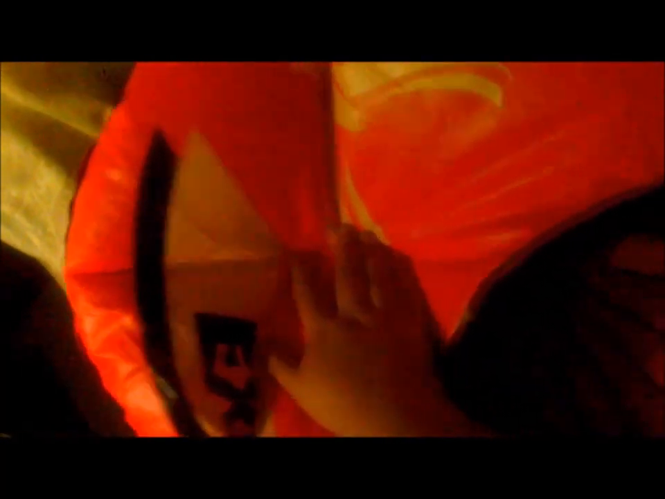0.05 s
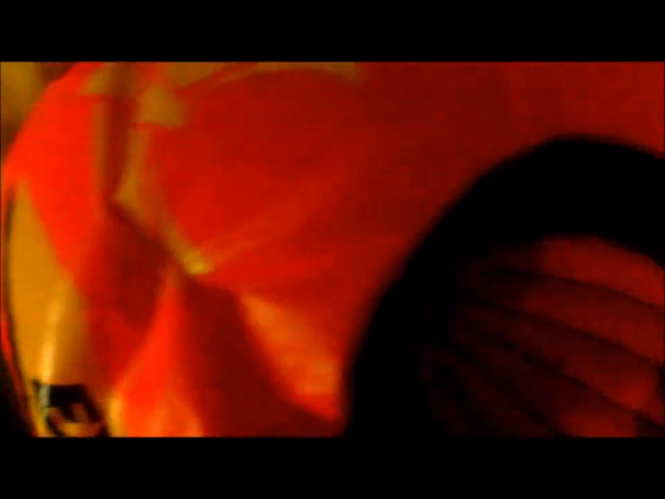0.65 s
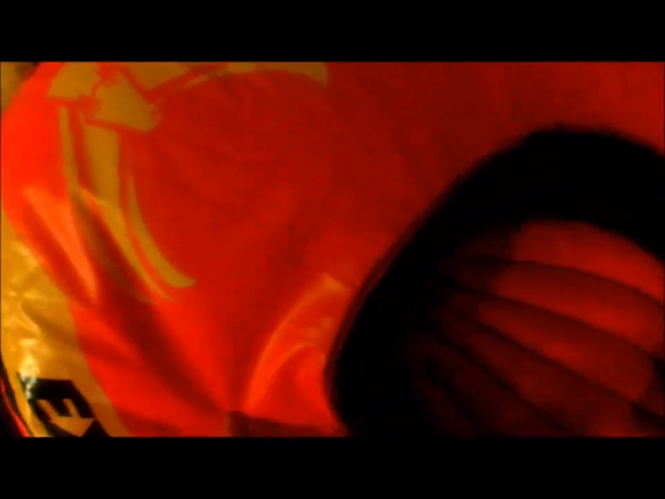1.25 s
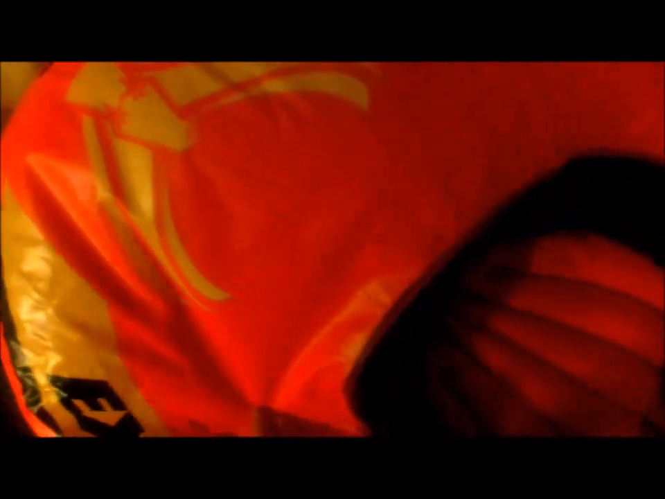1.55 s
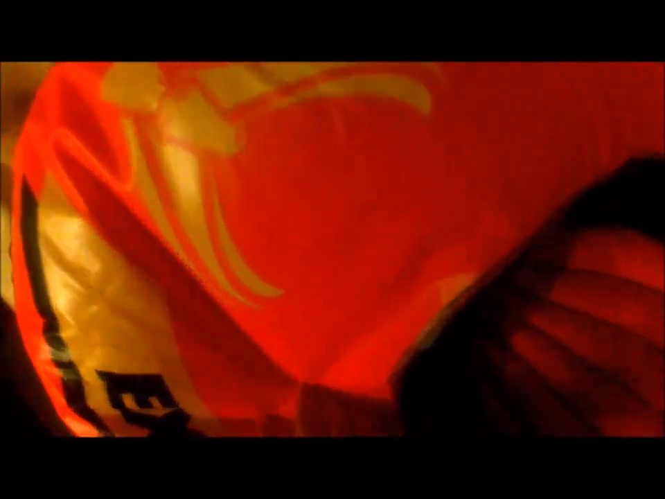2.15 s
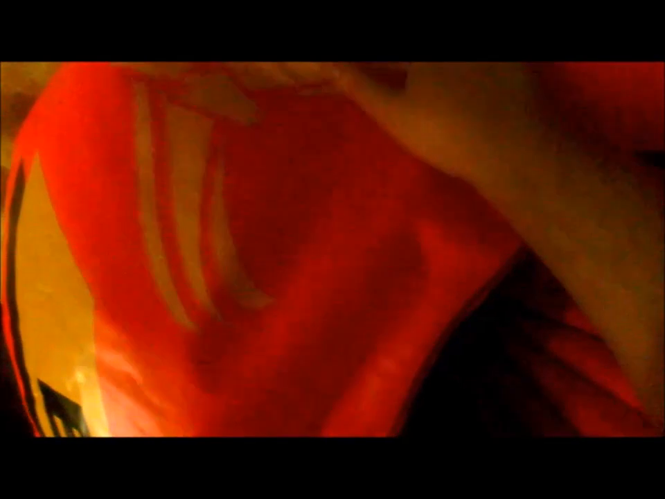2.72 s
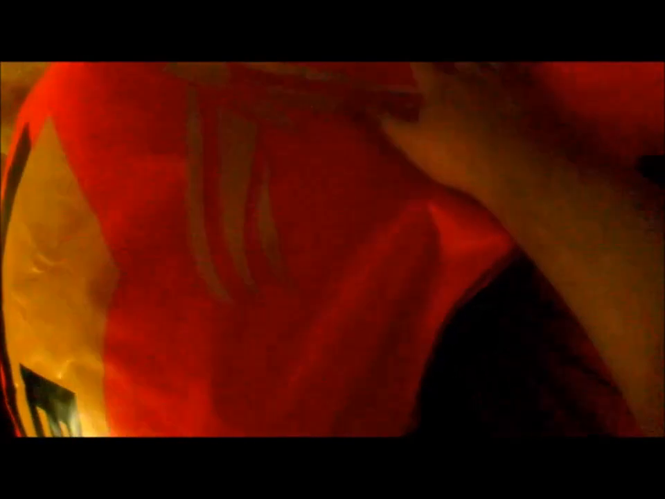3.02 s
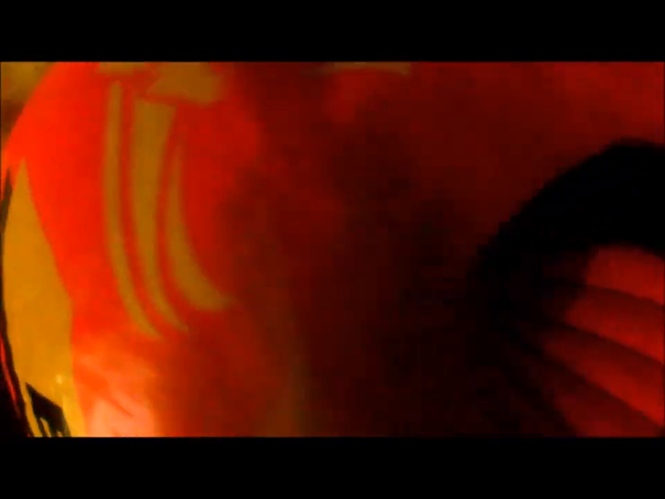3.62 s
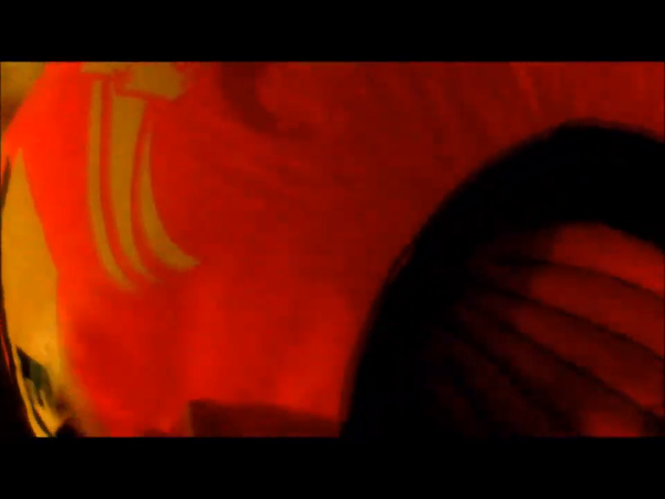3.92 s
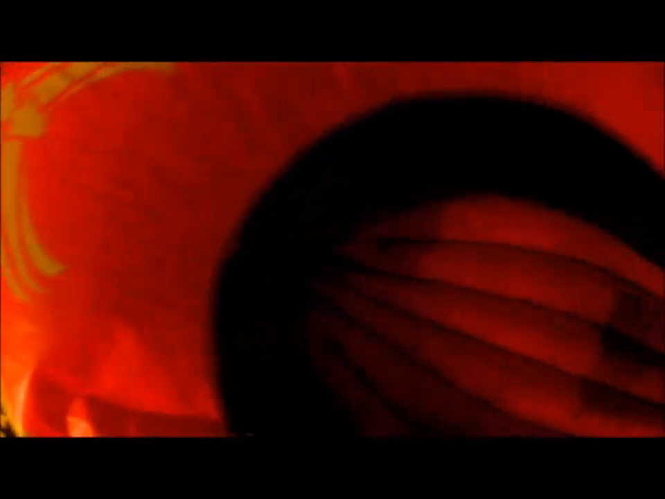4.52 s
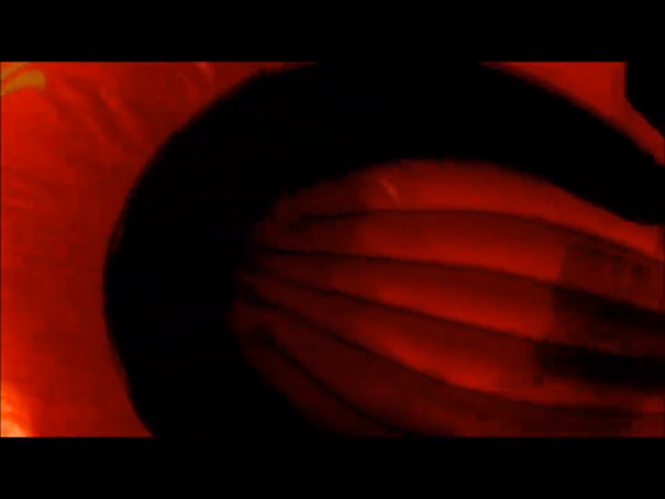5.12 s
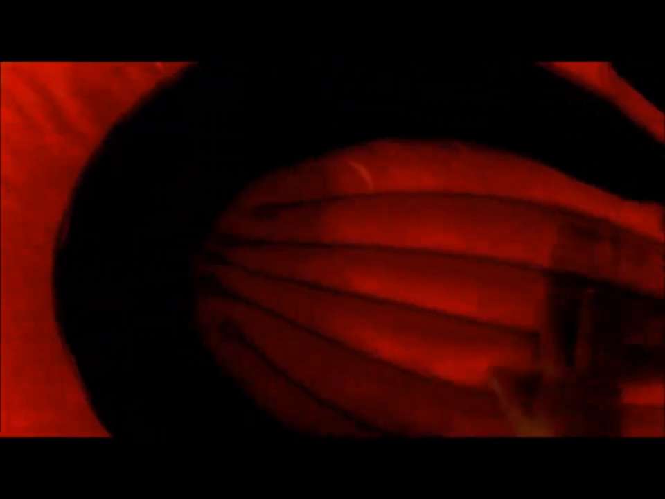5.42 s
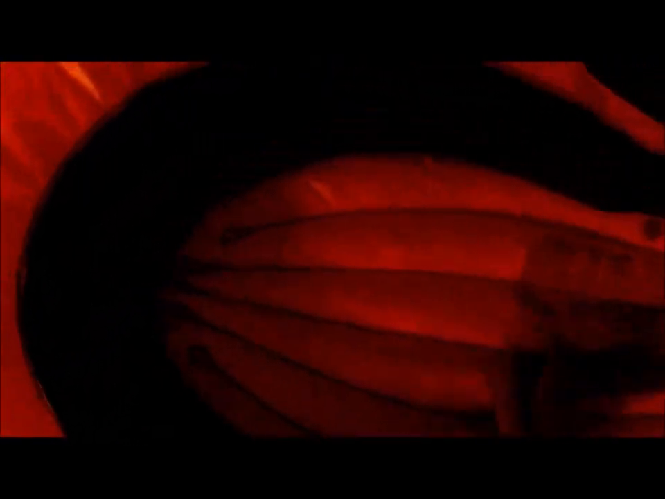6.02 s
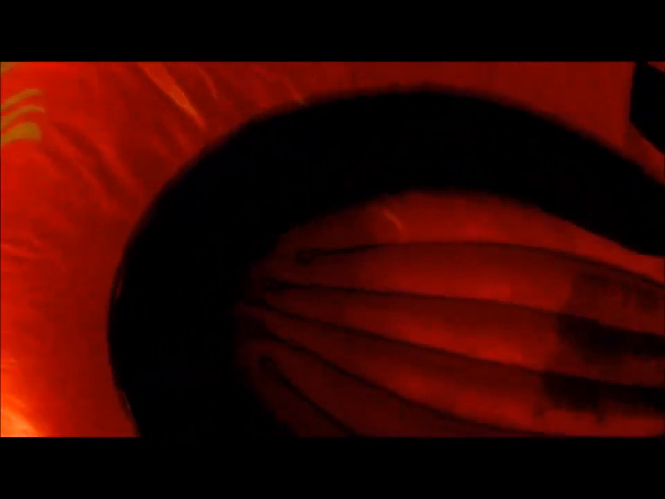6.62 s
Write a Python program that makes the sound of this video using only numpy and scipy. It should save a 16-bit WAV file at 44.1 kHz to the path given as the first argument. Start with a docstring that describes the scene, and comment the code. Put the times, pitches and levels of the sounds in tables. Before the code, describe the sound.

Hands squeeze an inflatable vinyl boat close to the microphone in a small, quiet room. At about 0.3 seconds, fingers judder over the vinyl and creases snap loudly, followed by dull pops from the tube. Soft palm scuffs, rustling folds and small pops continue over a faint hiss. Around 2.5 seconds the vinyl crackles, and the valve gives two bright spurts of hissing air before 3 seconds. Shorter, softer hisses come near 3.8 seconds and between 4.1 and 5.2 seconds, among more rubbing and buckling, with a very faint, thin whistling leak from about 4.2 to 5.5 seconds. Near 5.7 seconds the tube thumps, creases snap and wrinkles crackle with a puff of air. The loudest hisses follow at about 6.3 and 6.6 seconds as the palms scuff and push again.

```python
"""Deflating a vinyl boat

A small furnished room, one microphone close to the boat. Each push of the hands drives a bright,
turbulent hiss from the valve, and late on a thin leak sings faintly there. Palms scuff over the vinyl,
fingers judder and slack folds rustle. The air-filled tube rumbles and buckles with dull pops,
taut creases snap, and small wrinkles crackle."""
import sys
import numpy as np
from scipy import signal
from scipy.fft import rfft, irfft
from scipy.io import wavfile
from scipy.ndimage import map_coordinates

SR = 44100
rng = np.random.default_rng(int(sys.argv[2]) if len(sys.argv) > 2 else 0)


def output_pcm(signal):
    """Save a mono or channel-first signal as 16-bit PCM at the path in sys.argv[1].

    Samples are clipped to [-1, 1] before scaling.
    """
    pcm = np.clip(np.atleast_2d(signal).T, -1, 1) * 32767
    wavfile.write(sys.argv[1], SR, np.round(pcm).astype(np.int16))


N = 298116
TIME = np.arange(N) / SR
HAND_TIME = TIME[::32]  # hands move slowly, so a coarse clock is enough for them


def gain_of(db):
    """Decibels to amplitude."""
    return 10 ** (np.asarray(db) / 20)


def unit_rms(x):
    """Scales to rms 1."""
    return x / np.sqrt(np.mean(x ** 2) + 1e-20)


def coloured(x, spectrum):
    """Filters x by a spectrum with rows of frequency_hz, level_db."""
    hz, db = np.transpose(spectrum)
    bins_hz = np.fft.rfftfreq(len(x), 1 / SR)
    response = gain_of(np.interp(np.log(bins_hz + 1), np.log(hz), db))
    return irfft(rfft(x) * response, len(x))


def wander(rate_hz):
    """A smooth random curve of rms 1, moving mostly slower than rate_hz."""
    relative_rate = np.fft.rfftfreq(N, 1 / SR)[:N // 8] / rate_hz
    real, imaginary = rng.standard_normal((2, len(relative_rate)))
    return unit_rms(irfft((real + 1j * imaginary) / (1 + relative_rate ** 4), N))


def slips(per_s, spread_db):
    """Tiny random stick-slip clicks; spread_db sets how unequal they are."""
    size = gain_of(spread_db * np.minimum(rng.exponential(1, N), 4))
    sign = rng.choice([-1, 1], N)
    return unit_rms(size * sign * (rng.random(N) < per_s / SR))


def add(mix, start_s, sound):
    """Mixes a sound in at start_s."""
    part = mix[round(start_s * SR):][:len(sound)]
    part += sound[:len(part)]


def per_sample(*controls):
    """Spreads hand controls from the coarse clock over every sample."""
    return [np.interp(TIME, HAND_TIME, control) for control in controls]


def stroke(peak_s, rise_s, fall_s, roundness, drop_db=10):
    """Power of one hand movement, drop_db down one rise before and one fall after its peak."""
    away = np.maximum((peak_s - HAND_TIME) / rise_s, (HAND_TIME - peak_s) / fall_s)
    return gain_of(-drop_db * np.minimum(away, 10) ** roundness) ** 2  # roundness 1: pointed, 2: a bell


# The quiet room at the microphone: frequency_hz, level_db
ROOM_TONE_SPECTRUM = [(20, 1), (55, 8), (120, -9), (300, -19), (700, -2), (1300, -7), (3000, -13),
                      (7500, -6.5), (10000, -1), (14000, -10.5)]
def room_tone(level_db=-60):
    """Steady room rumble and microphone hiss."""
    return gain_of(level_db) * unit_rms(coloured(rng.standard_normal(N), ROOM_TONE_SPECTRUM))


def room_reverb(x, t60_s=0.072, wet_db=-19):
    """The furnished room adds a faint short tail behind the close sound."""
    t = np.arange(SR // 3) / SR
    tail = rng.standard_normal(len(t)) * gain_of(-60 * t / t60_s) * (t > .004)
    return x + gain_of(wet_db) * signal.fftconvolve(x, tail / np.linalg.norm(tail))[:N]


def near_reflections(x, echo_db, span_s, sway_s, count=6, above_hz=3000):
    """Small nearby walls mirror the treble and comb it; the notches drift as the walls move."""
    out = x.copy()
    treble = signal.sosfilt(signal.butter(2, above_hz, "high", fs=SR, output="sos"), x)
    for nominal_s in np.geomspace(span_s / 5, span_s, count):
        delay_s = nominal_s * rng.uniform(.85, 1.15) + sway_s * wander(1)
        out += gain_of(echo_db) * map_coordinates(treble, [(TIME - delay_s) * SR], order=3)
    return unit_rms(out)


def resonate(x, hz, width_hz):
    """A resonance of gain 1 whose pitch follows the curve hz."""
    turn = np.exp(2j * np.pi * np.cumsum(hz) / SR)
    pole = np.exp(-np.pi * width_hz / SR)
    return 2 * (turn * signal.lfilter([1 - pole], [1, -pole], x / turn)).real


# A thin leak at the valve, faint even this close: time_s, level_db
LEAK_LEVELS = [(4.15, -72), (4.4, -62), (4.62, -68), (4.84, -61), (4.93, -69), (5.03, -68), (5.14, -54),
               (5.25, -71), (5.38, -70), (5.45, -62), (5.58, -80)]
def leak(low_hz=4350, low_width_hz=520, high_hz=5850, high_width_hz=1800, drift=0.0086):
    """Slow air excites a narrow, slightly drifting resonance of the valve and a broader one above it."""
    sway = np.exp(drift * wander(7))
    air = rng.standard_normal(N)
    whistle = np.zeros(N)
    for hz, width_hz in [(low_hz, low_width_hz), (high_hz, high_width_hz)]:
        band = resonate(air, hz * sway, width_hz)
        whistle += unit_rms(resonate(band, hz * sway, width_hz))  # a second pass narrows the band
    level_db = np.interp(TIME, *np.transpose(LEAK_LEVELS), left=-np.inf, right=-np.inf)
    return gain_of(level_db) * whistle


# Small creases under the palm: frequency_hz, level_db
CRINKLE_SPECTRUM = [(200, -8), (500, -7.5), (900, 3.5), (1600, -6), (3000, 0), (7000, -18)]
def crinkles(scuff, gain_db=-10):
    """The sliding palm drags small creases over, each with a dry tick."""
    ticks = coloured(slips(per_s=260, spread_db=3), CRINKLE_SPECTRUM)
    return gain_of(gain_db) * scuff * unit_rms(ticks)


# The hollow, air-filled tube as it flexes: frequency_hz, level_db
RUMBLE_SPECTRUM = [(25, 5), (60, -1), (115, 8), (180, -4), (300, -10.5), (700, -22), (2000, -68)]
def tube_rumble(scuff, air, gain_db=-52, full_push_db=-52.5, vent_db=-32.5, lumpy_db=7):
    """The tube rumbles as it gives under the palm, less so once the air rushes out freely."""
    give = np.tanh(scuff / gain_of(full_push_db))
    venting = np.hypot(1, air / gain_of(vent_db))
    rumble = coloured(rng.standard_normal(N), RUMBLE_SPECTRUM) * gain_of(lumpy_db * wander(16))
    return gain_of(gain_db) * give / venting * unit_rms(rumble)


# Palms rubbing the boat, close up: frequency_hz, level_db
PALM_SPECTRUM = [(300, -10), (800, -5.5), (1400, 0.5), (2500, 2), (4300, 0.5), (6000, -4.5), (8000, -9),
                 (10000, -4.5), (14000, -31)]
def palms(scuff, gain_db=1.5, patchy_db=1):
    """Dense slips of skin on vinyl merge into a scuff."""
    rub = coloured(slips(per_s=5000, spread_db=2.5), PALM_SPECTRUM) * gain_of(patchy_db * wander(23))
    return gain_of(gain_db) * scuff * near_reflections(rub, echo_db=-3.5, span_s=.007, sway_s=.0004)


# Small wrinkles letting go: start_s, level_db, decay_s
WRINKLE_BURSTS = [(2.485, -34, .006), (2.4995, -32, 0.0026), (4.1, -39.5, 0.0086), (5.038, -38, 0.0044),
                  (5.564, -43, 0.0051), (5.6935, -26.5, 0.0017), (5.7004, -29, 0.0017),
                  (5.705, -30, 0.0034), (5.716, -31, 0.0064), (6.107, -35.5, 0.0044),
                  (6.192, -26.5, 0.0053)]
# Their colour, close up: frequency_hz, level_db
WRINKLE_SPECTRUM = [(200, 11.5), (1200, 5), (2800, 8), (5000, 5), (7500, 1), (11000, 3), (14000, 5)]
def crackles():
    """Each wrinkle lets go in a short bright burst of noise."""
    bursts, t = np.zeros(N), np.arange(SR // 8) / SR
    for start_s, level_db, decay_s in WRINKLE_BURSTS:
        add(bursts, start_s, gain_of(level_db) * np.exp(-t / decay_s))
    return bursts * unit_rms(coloured(rng.standard_normal(N), WRINKLE_SPECTRUM))


# Slack folds rolling over: peak_s, rise_s, fall_s, level_db
FOLD_ROLLS = [(0.04, .03, 0.15, -62), (0.28, 0.059, 0.048, -40.5), (0.36, 0.04, 0.045, -29.5),
              (0.534, 0.021, 0.038, -40.5), (0.63, 0.06, 0.091, -52), (1.233, 0.044, 0.14, -51),
              (1.57, .03, .03, -54), (1.76, 0.098, 0.066, -53.5), (2.22, 0.073, 0.12, -51),
              (2.439, 0.051, 0.045, -40), (2.84, 0.13, 0.4, -51.5), (3.04, 0.088, 0.083, -47),
              (3.14, 0.048, .1, -46), (3.651, .08, 0.09, -41), (3.88, 0.074, 0.053, -49.5),
              (4.151, .04, 0.037, -53), (4.265, 0.044, 0.018, -50.5), (4.48, .03, 0.091, -48.5),
              (4.6, .03, 0.052, -48), (5.06, 0.016, 0.15, -45), (5.14, .05, 0.055, -44.5),
              (5.762, 0.047, .045, -32.5), (5.89, 0.043, 0.078, -40), (5.955, .035, 0.041, -40),
              (6.06, 0.055, 0.07, -52), (6.205, .015, 0.022, -45), (6.31, 0.03, 0.33, -51),
              (6.63, 0.024, 0.068, -45.5)]
# Fingers dragging on the vinyl: peak_s, rise_s, fall_s, level_db, slip_rate_hz
FINGER_DRAGS = [(0.395, 0.074, 0.08, -31, 500), (1.855, 0.029, .055, -37, 268),
                (1.965, 0.024, .06, -41, 200), (2.079, 0.031, .05, -44, 260), (2.515, .03, .1, -36, 313),
                (2.669, 0.044, .025, -39, 194), (3.335, .03, .04, -39, 330), (3.435, 0.023, .025, -43, 240),
                (3.511, 0.0218, .02, -44, 190), (3.723, .035, .06, -36, 286),
                (4.335, 0.064, .04, -41.5, 335), (5.376, .028, 0.054, -42.5, 330)]
def sheet_motion(roundness=1.6, rest_db=-64, judder_share=0.66):
    """Amplitudes of loose rustle and of judder, and the slip rate of the finger that drags hardest."""
    roll_power = sum(gain_of(db) ** 2 * stroke(*timing, roundness) for *timing, db in FOLD_ROLLS)
    drags = np.array([gain_of(db) ** 2 * stroke(*timing, roundness) for *timing, db, _ in FINGER_DRAGS])
    slip_rate_hz = np.array([hz for *_, hz in FINGER_DRAGS])[drags.argmax(axis=0)]
    drag_power = drags.sum(axis=0)
    loose_power = gain_of(rest_db) ** 2 + roll_power + (1 - judder_share) * drag_power
    return per_sample(np.sqrt(loose_power), np.sqrt(judder_share * drag_power), slip_rate_hz)


# The slack vinyl sheet shaking: frequency_hz, level_db
SHEET_SPECTRUM = [(20, -0.5), (60, -1), (130, 1.5), (260, 0.5), (480, -4.5), (750, -8.5), (1100, -14.5),
                  (2000, -18.5), (5000, -51)]
# Small separate puckers in the sheet: frequency_hz, level_db
PUCKER_SPECTRUM = [(150, -16), (400, 11), (700, 12.5), (1100, 9), (1800, -4), (4000, -27)]
def folds(clump_db=3, jitter=0.22, uneven_db=5, pucker_db=-16):
    """Loose slips shake the sheet; under pressure they lock into an uneven stick-slip judder."""
    rolling, dragging, slip_rate_hz = sheet_motion()
    phase = 2 * np.pi * np.cumsum(slip_rate_hz * np.exp(jitter * wander(139.5))) / SR
    jerks = np.cos(phase) + 0.33 * np.cos(2 * phase) + 0.14 * np.cos(3 * phase)
    judder = unit_rms(coloured(jerks * gain_of(uneven_db * wander(170)), SHEET_SPECTRUM))
    loose_slips = coloured(slips(per_s=1400, spread_db=-0.5), SHEET_SPECTRUM)
    rustle = unit_rms(loose_slips * gain_of(clump_db * wander(26)))
    puckers = unit_rms(coloured(slips(per_s=200, spread_db=4), PUCKER_SPECTRUM))
    puckering = gain_of(pucker_db) * np.hypot(rolling, dragging)
    return dragging * judder + rolling * rustle + puckering * puckers


# Modes of the soft tube: pitch_hz, level_db, t60_s
TUBE_MODES = [(73.6, 1.5, 0.034), (111.4, -7.5, 0.1), (182, -4.5, 0.057), (554, 3, 0.009)]
# The tube wall buckling near the microphone: centre_s, relative_level_db, pitch_hz, ring_db
WALL_BUCKLES = [(0.484, -26.5, 148, -11), (0.544, -22.5, 84, -23), (0.614, -18.5, 159.8, -7),
                (1.013, -23.5, 102, -12), (1.063, -36.5, 72.5, -27), (1.226, -33, 265, 8.5),
                (1.2407, -37, 556, -26), (1.257, -35.5, 557, -24), (1.287, -38, 87, -4),
                (1.359, -45, 350, -6), (1.426, -44, 526, -20.5), (1.475, -25, 291, -3),
                (1.679, -40, 175, 5), (1.717, -29.5, 258, 0.5), (2.487, -25, 210, -24),
                (2.772, -35, 187.6, -13), (2.87, -34, 290, 2), (3.152, -40.5, 330, -7),
                        (3.303, -30.5, 238.2, -6), (3.434, -36, 210, -6), (3.983, -44, 241, -9),
                (4.159, -37, 159, -2), (4.229, -35, 104.2, -13), (4.311, -30.5, 293, -4.5),
                (4.35, -30, 560, -28), (4.509, -34, 261, -25), (4.59, -38, 387, -2), (4.788, -46, 221, -25),
                (5.141, -27.5, 208, -4), (5.352, -21, 232, -14), (5.394, -46, 420, -24),
                (5.729, -14, 210, -4.5), (6.197, -33, 157, -6), (6.295, -30.5, 280, -14),
                (6.397, -30.5, 320, -19), (6.67, -23.5, 820, -11)]
def pops(gain_db=-1, lead_s=0.0079, low_cut_hz=60):
    """A patch of wall flips over: one smooth pull and push of air, then the tube rings briefly."""
    out, t = np.zeros(N), np.arange(SR // 8) / SR - lead_s
    after_s = np.maximum(t, 0)
    for centre_s, level_db, pitch_hz, ring_db in WALL_BUCKLES:
        phase = 2 * np.pi * pitch_hz * t
        flip = phase * np.exp((1 - phase ** 2) / 2)
        detune = rng.uniform(.92, 1.08)
        ring = sum(gain_of(db - 60 * after_s / t60_s) * np.sin(2 * np.pi * hz * detune * after_s)
                   for hz, db, t60_s in TUBE_MODES)
        swell = 1 - np.exp(-phase ** 2 / 2)  # the ring builds up no faster than the flip
        pop = flip + gain_of(ring_db) * swell * ring
        add(out, centre_s - lead_s, gain_of(level_db + gain_db) * pop)
    # a small patch radiates little bass
    return signal.sosfilt(signal.butter(1, low_cut_hz, "high", fs=SR, output="sos"), out)


# Taut creases snapping through, close up: start_s, relative_level_db, twice_pitch_hz
CREASE_SNAPS = [(0.34, -11, 450), (0.362, -30, 450), (0.374, -39, 454), (0.404, -11.5, 360),
                (1.5985, -32, 556), (2.674, -25.5, 716), (2.92, -39, 400), (3.04, -47, 382),
                (3.297, -34, 350), (3.434, -34.5, 500), (3.689, -30, 353.3), (3.728, -32, 348.5),
                (5.7826, -10.5, 352), (5.9611, -22, 560), (6.194, -22.5, 664)]
def snaps(gain_db=3.5, high_cut_hz=3000):
    """A sudden drop of pressure with a slower rebound, rounded by the soft vinyl."""
    out, t = np.zeros(N), np.arange(SR // 40) / SR
    for start_s, level_db, twice_pitch_hz in CREASE_SNAPS:
        phase = np.pi * twice_pitch_hz * t
        add(out, start_s, gain_of(level_db + gain_db) * (phase - 1) * np.exp(-phase))
    return signal.sosfilt(signal.butter(3, high_cut_hz, fs=SR, output="sos"), out)


# A palm sliding and pressing air out: peak_s, rise_s, fall_s, air_db, relative_scuff_db
HAND_PUSHES = [(0.08, 0.18, 0.32, -59, -55.5), (0.40, 0.12, 0.14, -46, -52.5), (0.93, 0.9, 1, -58.5, -62.5),
               (1.845, .015, 0.036, -43.5, -53), (2.202, 0.48, 0.27, -58, -59),
               (2.44, 0.063, 0.048, -49.5, -55), (2.51, 0.03, 0.2, -45, -48),
               (2.671, 0.078, .085, -28, -55), (2.835, 0.039, .055, -28, -49.5),
               (3.08, 0.49, 0.6, -48, -52.5), (3.31, .025, 0.27, -64, -64.5),
               (3.735, 0.13, 0.066, -59, -49.5), (3.83, 0.18, 0.043, -33, -52.5),
               (4.129, 0.032, 0.17, -40.5, -52.5), (4.401, .15, 0.077, -44.5, -56.5),
               (4.539, 0.057, 0.053, -41.5, -52), (4.78, 0.24, 0.13, -51.5, -64),
               (4.995, 0.017, .02, -49.5, -63), (5.06, 0.025, 0.12, -55, -49.5),
               (5.145, 0.068, .04, -37, -65), (5.38, 0.12, 0.11, -56.5, -65.5),
               (5.578, .006, 0.054, -46.5, -58.5), (5.707, 0.015, 0.02, -31.5, -47),
               (5.775, 0.035, 0.04, -32.5, -40), (5.89, 0.062, 0.065, -40, -49.5),
               (5.955, 0.052, 0.065, -42.5, -50), (6.206, 0.045, 0.067, -34.5, -41),
               (6.34, 0.12, 0.19, -22, -43), (6.625, 0.1, 0.18, -19.5, -38.5)]
def pushes(roundness=1.63, rest_air_db=-57, rest_scuff_db=-67.5):
    """Amplitudes of the escaping air and of the sliding palm, both driven by the same pushes."""
    air_power = gain_of(rest_air_db) ** 2  # the boat keeps sagging between strokes
    scuff_power = gain_of(rest_scuff_db) ** 2
    for peak_s, rise_s, fall_s, air_db, scuff_db in HAND_PUSHES:
        effort = stroke(peak_s, rise_s, fall_s, roundness)
        air_power += gain_of(air_db) ** 2 * effort
        scuff_power += gain_of(scuff_db) ** 2 * effort
    return per_sample(np.sqrt(air_power), np.sqrt(scuff_power))


# The jet from the valve, close to the microphone: frequency_hz, level_db
JET_SPECTRUM = [(1000, -42), (3000, -40), (5000, -16), (7500, -13.5), (9000, -10), (10300, -8), (11200, -2),
                (12000, -3), (12700, -3), (14000, -4)]
def valve_hiss(air, flutter_db=0.84, grit_db=2):
    """A turbulent jet that flutters slowly and sputters finely."""
    turbulence = rng.standard_normal(N) * gain_of(flutter_db * wander(33) + grit_db * wander(820))
    jet = coloured(turbulence, JET_SPECTRUM)
    return air * near_reflections(jet, echo_db=-11, span_s=.010, sway_s=.0001)


def scene():
    """The boat in its small room, heard from one close microphone."""
    air, scuff = pushes()
    escaping_air = valve_hiss(air) + leak()
    handling = palms(scuff) + crinkles(scuff) + tube_rumble(scuff, air)
    vinyl = folds() + pops() + snaps() + crackles()
    return (room_reverb(escaping_air + handling + vinyl) + room_tone())[None]


def record(dry, low_cut_hz=35, high_cut_hz=14050, dc_offset=.0018):
    """The small microphone loses the deepest bass and sits on a tiny offset; the top treble is cut."""
    thin = signal.sosfilt(signal.butter(2, low_cut_hz, "high", fs=SR, output="sos"), dry) + dc_offset
    band_limit = signal.firwin(601, high_cut_hz, window=("kaiser", 8), fs=SR)
    return signal.oaconvolve(thin, band_limit[None], "same")


dry = scene()
out = record(dry)
output_pcm(out)
```